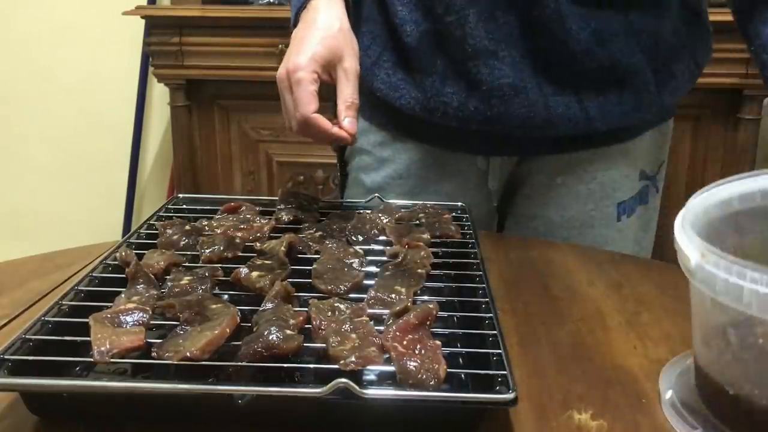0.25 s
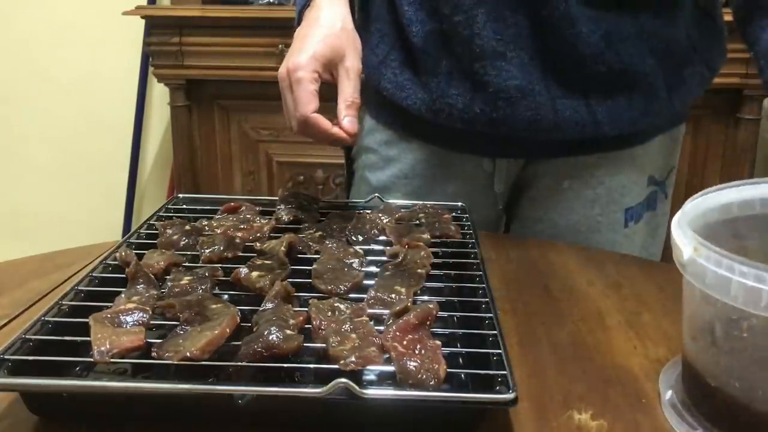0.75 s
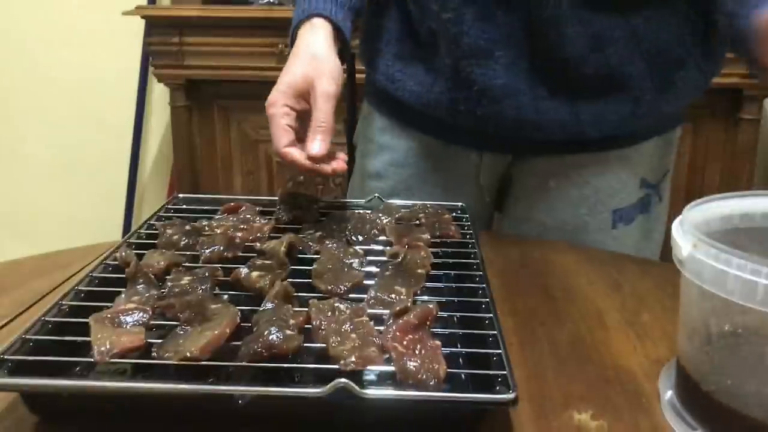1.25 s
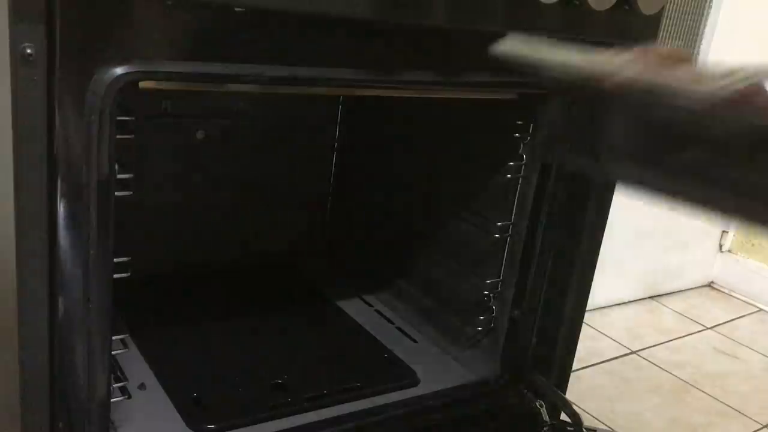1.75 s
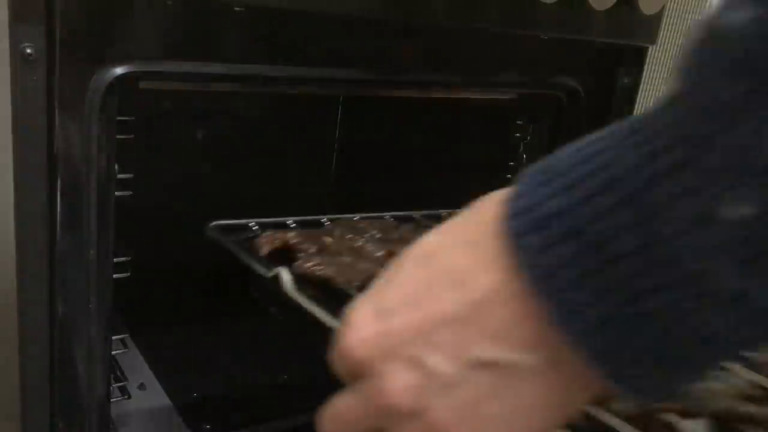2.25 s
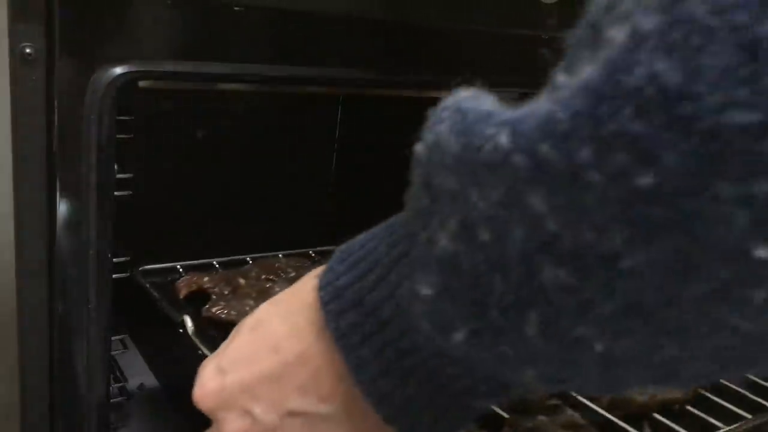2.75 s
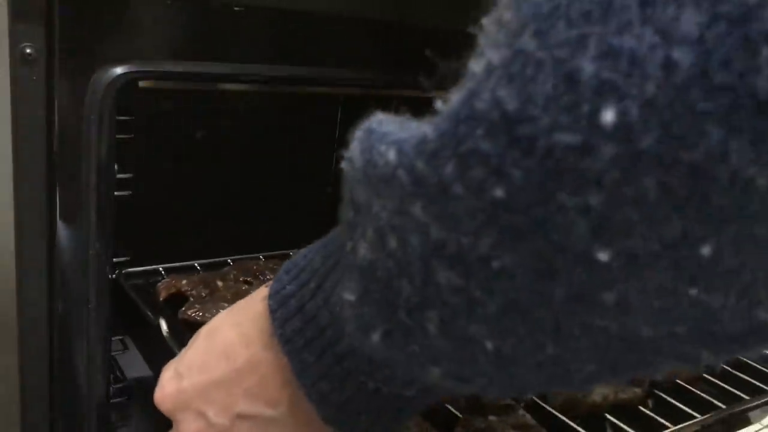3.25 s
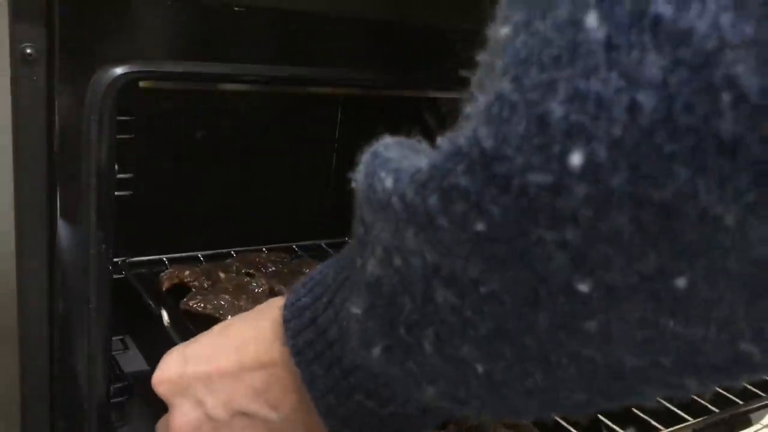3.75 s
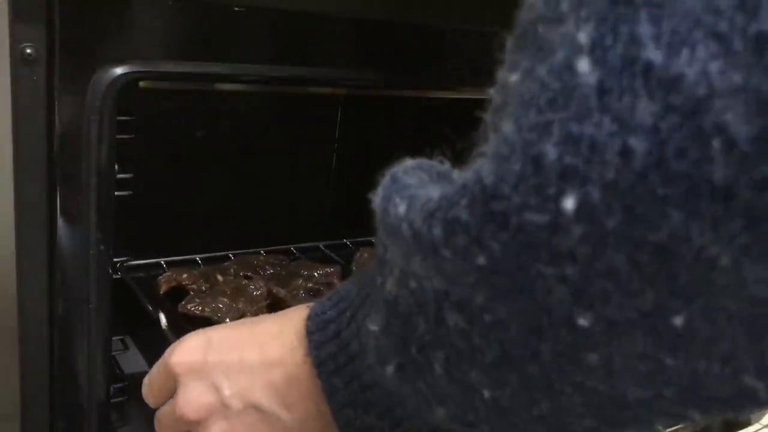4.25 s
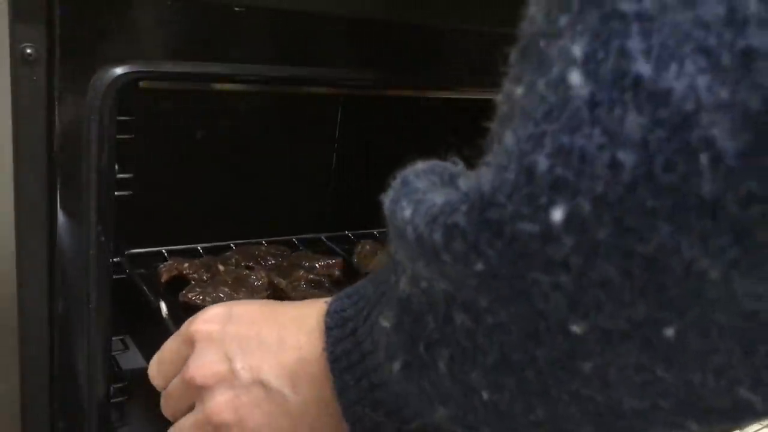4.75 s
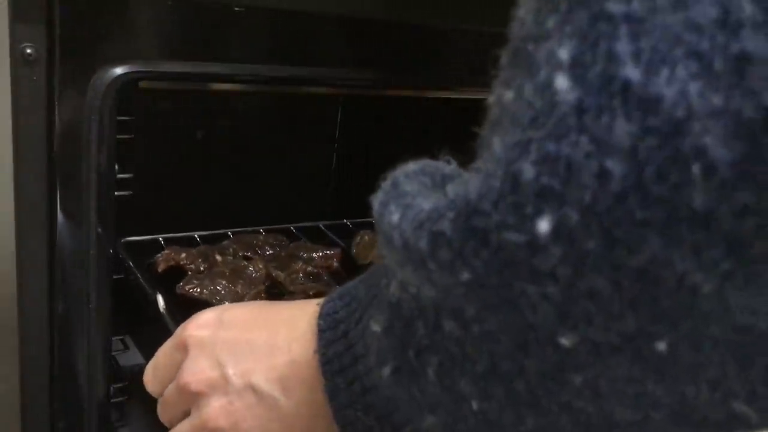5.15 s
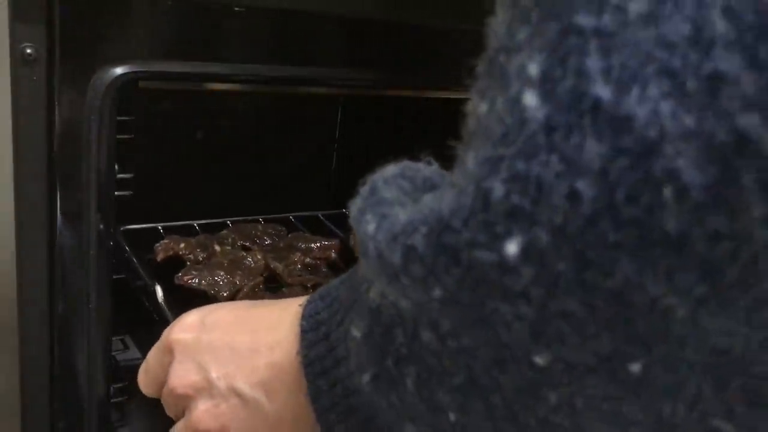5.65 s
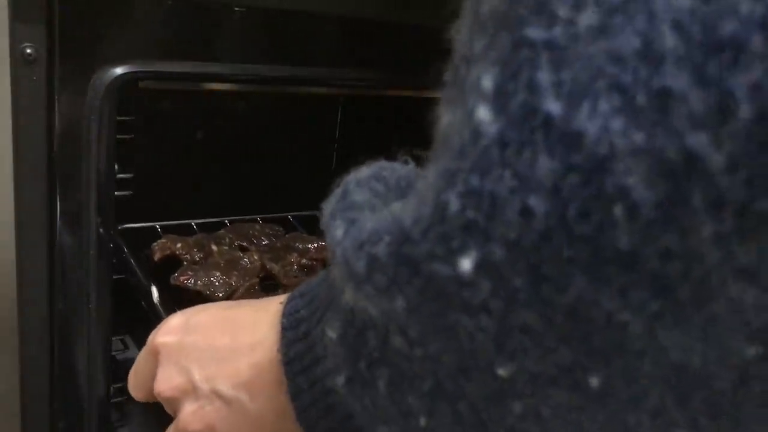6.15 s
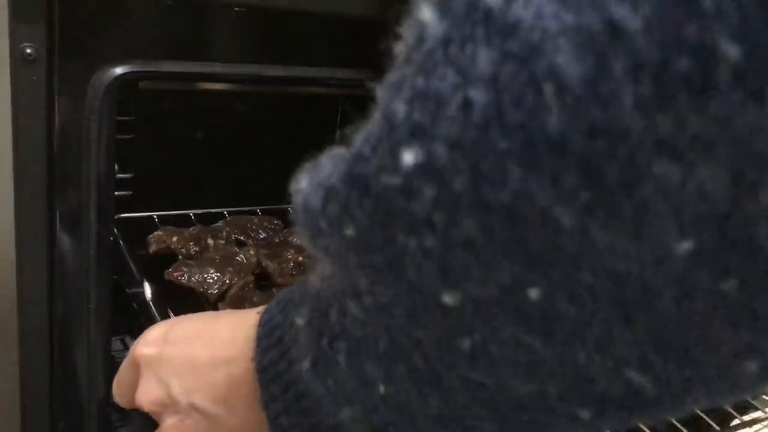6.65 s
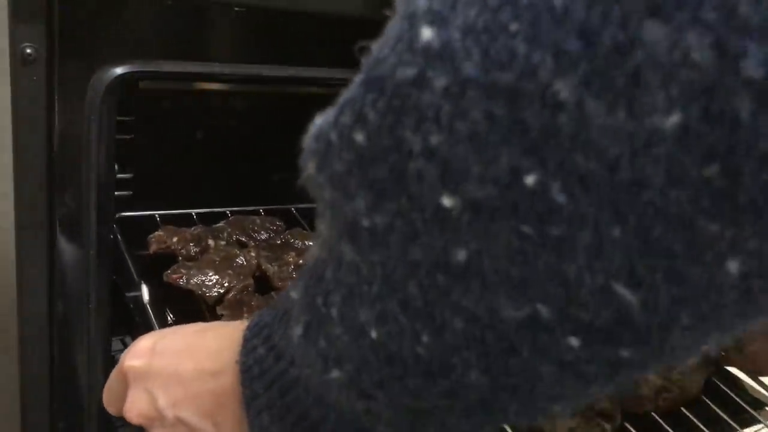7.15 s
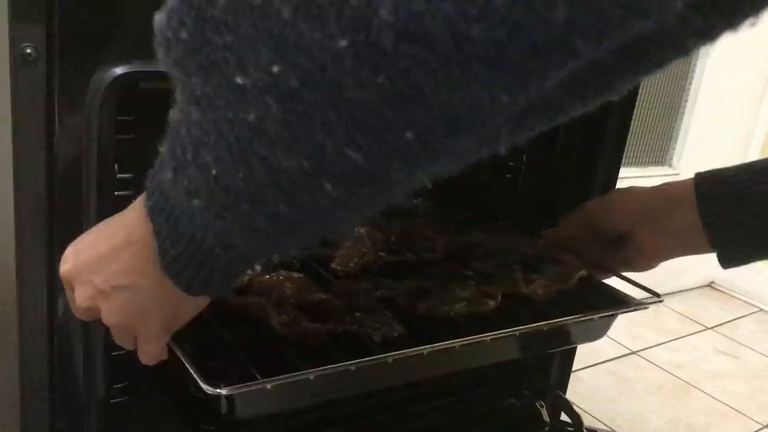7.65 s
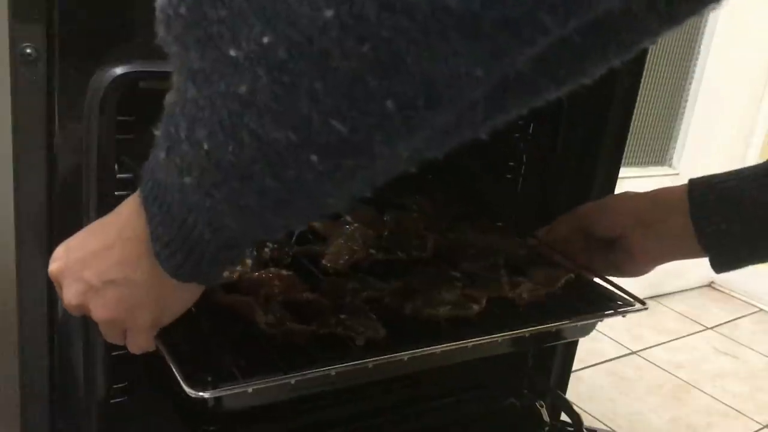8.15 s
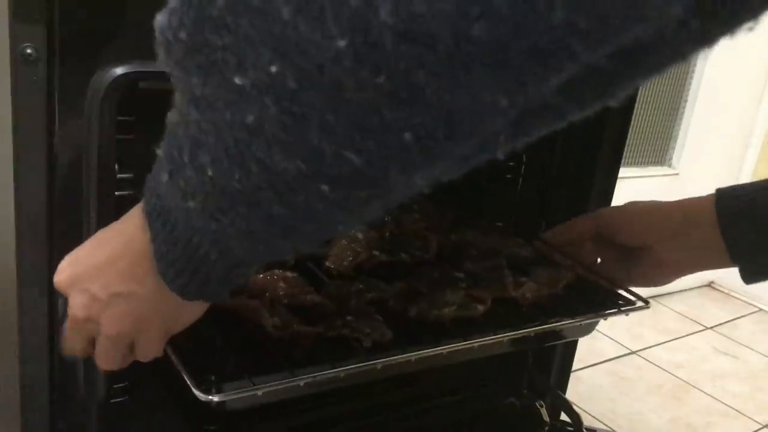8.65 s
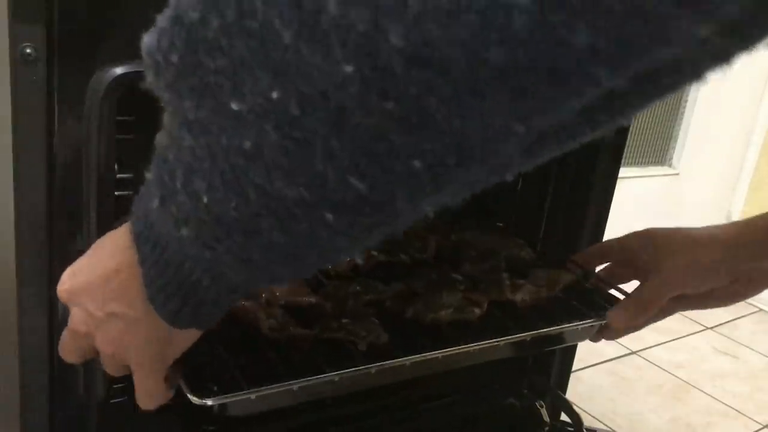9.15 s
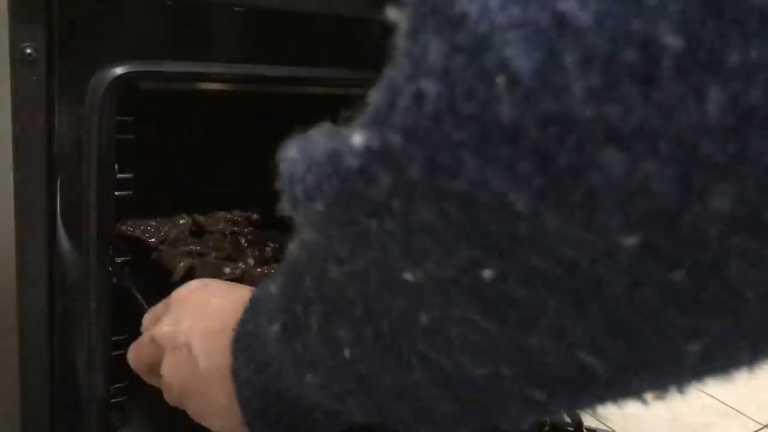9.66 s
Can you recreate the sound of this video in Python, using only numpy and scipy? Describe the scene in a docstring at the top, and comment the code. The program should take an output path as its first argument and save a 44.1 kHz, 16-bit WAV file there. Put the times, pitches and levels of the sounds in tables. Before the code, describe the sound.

Faint microphone hiss lies under a small, hard, tiled kitchen. At about 0.4 s a plastic tub gives a quick cluster of clicks on a wooden table, then faint taps and a tiny drag, and at 0.9 s it is set down with a loud, sharp thud. From 1.4 to 2.3 s slippers scuff and step over tiles, the second heel tap firmer. After a pause, a wire rack on a baking tray clanks at 3.4 s, then knocks and chatters sparsely until 6.4 s, when a stronger clank rings. Around 7.5 to 7.7 s it scrapes grittily along the oven runners; more clanks follow at 8.0 s, with a hard bright bang near 8.5 s and low, faint tray flexing. After smaller rattles, loud jangling blows burst from 9.4 to 9.8 s. The steel oven adds a short, boxy ring.

```python
"""A small hard kitchen with a tiled floor and an open oven, under a faint microphone hiss.
A plastic tub clicks, drags and thuds onto a wooden table; slippers scuff and step over the tiles.
Then a wire rack on a baking tray knocks, chatters and scrapes along the oven runners.
Short contact pressures and gritty noise are heard directly and drive the ringing modes of table, tray
and wires. Tub and slippers echo in the room, the rack in the steel oven."""
import sys
import numpy as np
from scipy import signal
from scipy.fft import rfft, irfft
from scipy.io import wavfile

SR = 44100
rng = np.random.default_rng(int(sys.argv[2]) if len(sys.argv) > 2 else 0)


def pcm_store(signal):
    """Save signal as 16-bit PCM."""
    levels = np.round(np.clip(np.atleast_2d(signal), -1, 1) * 32767)
    wavfile.write(sys.argv[1], SR, levels.astype(np.int16).T)


N = 436590

# Levels are relative: each source is balanced again where it is mixed.
# Hiss colour: (frequency [Hz], density [dB per Hz])
HISS_SPECTRUM = [(15, -51.5), (25, -14.5), (48, -11.5), (59, -1), (80, -1), (108, -12), (157, -7.5),
                 (416, -13.5), (489, -19), (2910, -26), (6210, -29), (14800, -33), (16000, -27.5)]
HISS_DB = -63   # before the drift
# The hiss rises and sinks a little: (time [s], gain [dB])
HISS_DRIFT = [(-.1, 0.5), (1.4, 6.5), (3.3, 2), (7.3, 2.5), (10.1, 5.5)]
# Microphone colour: (frequency [Hz], gain [dB])
MIC_SPECTRUM = [(30, -13.5), (100, -1.5), (5000, 0.5), (8000, 2.5), (10500, 4), (13000, 8), (15500, 6)]
CUTOFF_HZ = 16600

# Echo decay in the kitchen: (frequency [Hz], t60 [s])
KITCHEN_DECAY = [(60, 0.54), (250, 0.49), (1000, 0.51), (4000, 0.49), (8000, 0.49), (15000, 0.084)]
# Echo decay inside the oven: (frequency [Hz], t60 [s])
OVEN_DECAY = [(60, 0.33), (250, 0.71), (1000, 0.52), (2500, 0.33), (5000, 0.28), (9000, 0.27),
              (15000, 0.077)]

# Soles scuffing over tiles: (time [s], held [s], level [dB], treble level [dB])
SCUFFS = [(1.40, 0.17, -62.5, -70), (1.706, 0.13, -44, -78), (2.055, 0.041, -44.5, -53.5),
          (2.194, 0.0074, -32.5, -60), (2.255, 0.016, -40.5, -55)]
SCUFF_SWELL_DB_PER_S, SCUFF_FADE_DB_PER_S = 1300, 303
# Slipper heels on tiles: (time [s], level [dB])
HEEL_STEPS = [(1.704, -34.5), (2.1907, -24.5)]
HEEL_RISE_S, HEEL_CONTACT_S = 0.00042, 0.0051
# Heel bands against the step level
HEEL_THUD_DB, HEEL_MIDDLE_DB, HEEL_BRIGHT_DB, HEEL_TREBLE_DB = -28, 6, -8.5, -25

# Tub on table: (time [s], peak [dB], thud [dB], brightness [dB], contact [s], favoured table mode [Hz])
TUB_TAPS = [(0.3714, -30, -39, -5, 0.0037, 136), (.3743, -19, -48.5, 1, 0.0023, 136),
            (0.3861, -23, -41.5, 6, 0.0023, 136), (0.4067, -27, -45.5, -1, 0.0032, 136),
            (0.4298, -26.5, -42.5, 1.5, .001, 136), (0.4814, -37.5, -51.5, -1.5, .0015, 136),
            (.641, -46, -83, 2, .0012, 136), (0.683, -41, -54.5, -0.5, 0.0087, 136),
            (0.8848, -32, -47.5, 1.5, .0015, 136), (0.9325, 0, -10, 9.5, 0.0032, 194)]
# Middle and treble against the peak, at brightness 0
TAP_RISE_S, TAP_MIDDLE_DB, TAP_TREBLE_DB = 0.00086, 0, -24
# Table top modes: (frequency [Hz], level [dB], t60 [s], capped at 1200 cycles)
TABLE_MODES = [(86.6, 4.5, 0.18), (142.3, -4.5, 0.18), (194.5, -19, 0.3), (251.6, -8, 0.17),
               (312.7, -8.5, 0.11), (429, -2, 0.25), (559, -4.5, .25), (823, -7, .25)]
TABLE_FAVOUR_DB = 19.5
# The tub drags a little before it is set down hard: (time [s], held [s], level [dB])
TUB_DRAGS = [(.68, .015, -69), (.87, .05, -63)]
DRAG_SWELL_DB_PER_S, DRAG_FADE_DB_PER_S = 71, 253.5
# What the tub sends to the walls: (frequency [Hz], gain [dB])
TUB_TO_ROOM = [(100, -6.5), (1000, 0), (3500, -9.5), (10000, -7)]

# The loaded tray flexes as it is pushed: (time [s], held [s], level [dB])
TRAY_FLEXES = [(8.25, .03, -49.5), (8.59, 0.025, -51), (8.85, .04, -48.5)]
FLEX_HZ, FLEX_SWELL_DB_PER_S, FLEX_FADE_DB_PER_S = 58.4, 146, 120

# Rack and tray on the runners: (time [s], peak [dB], boom [dB], brightness [dB], chatter [s],
# favoured tray mode [Hz], favoured wire mode [Hz]); a mode of 0 or below favours none
RACK_CLANKS = [(3.4074, -17.5, -34, 4.5, 0.0086, 0, 2335), (3.6154, -39, -42.5, -12, 0.0056, 121, 2915),
               (3.8753, -28.5, -42.5, 1, 0.0087, 0, 1024), (4.4248, -54, -68, -16, .008, 0, 0),
               (4.5649, -29.5, -37, 8, 0.015, 0, 2127), (4.7006, -55, -48, -18, 0.012, 0, 0),
               (4.7806, -31, -36.5, -2, 0.0082, 121, 0), (4.954, -52, -44, 24, 0.0068, 0, 0),
               (5.1209, -24.5, -32.5, 5, 0.023, 0, 1615), (5.1506, -34.5, -24, 4, 0.014, 0, 0),
               (5.3168, -29, -40, -3.5, 0.0089, 0, 1700), (5.488, -53, -65, -10, 0.037, 0, 0),
               (5.5417, -35.5, -35.5, 0.5, 0.012, 202, 2335), (5.569, -44.5, -46, 12, 0.043, 202, 0),
               (5.9287, -63, -52.5, -14, 0.0088, 0, 1615), (6.0072, -55.5, -53.5, -6, .011, 291, 1328),
               (6.4478, -20, -34.5, 5, 0.01, 0, 1850), (6.5227, -44, -31, -9, 0.017, 0, 0),
               (6.5518, -34.5, -54, -5, 0.0059, 0, 2750), (6.7934, -46, -48, 3, 0.03, 0, -3),
               (7.0772, -46, -40, -5, 0.016, 121, 0), (7.1413, -24.5, -39.5, 5.5, 0.011, 264, 0),
               (7.386, -47.5, -69, 8, 0.016, 0, 0), (7.6416, -40, -48, 15, 0.0063, 0, 0),
               (7.7088, -37.5, -47, 21, 0.0039, 0, 0), (7.7636, -33, -46, -1, 0.0077, 0, 0),
               (7.9926, -31.5, -67, -3, 0.0038, 0, 0), (8.0375, -17.5, -33.5, 2.5, 0.011, 0, 2335),
               (8.0874, -37, -54, 0, 0.012, 0, 0), (8.163, -24, -40.5, 7, 0.014, 0, 0),
               (8.192, -45, -45, -6, .008, 0, 0), (8.3732, -50.5, -55, -20, .012, 0, 0),
               (8.4581, -7, -53, 4, 0.0089, 403, 0), (8.4657, -9.5, -48, 14.5, 0.0048, 403, 0),
               (8.5035, -23.5, -30, -17.5, 0.013, 403, 1106), (8.6488, -34, -35.5, -3, 0.0082, 0, 0),
               (8.701, -25, -38, 13.5, 0.012, 0, 0), (8.7362, -28, -37.5, -7.5, 0.0135, 0, -2),
               (8.9457, -34.5, -50, -4.5, 0.0076, 0, 0), (9.279, -49.5, -71, -13, .009, 0, 1178),
               (9.4095, -8, -60, 8, 0.012, 0, 1024), (9.424, -17.5, -41.5, -5, 0.015, 0, 1178),
               (9.4814, -11.5, -37, 6.5, 0.0082, 440, 2012), (9.5395, -22, -46, 5, 0.004, 0, 0),
               (9.5802, -21.5, -36, 3.5, 0.022, 0, 0), (9.7573, -23, -29.5, -3, 0.035, 86, -10),
               (9.7741, -17, -64, 8, 0.013, 0, -11), (9.859, -38, -48, 10, 0.0079, -4, 0)]
# Middle and treble against the peak, at brightness 0 and the usual level
CLANK_RISE_S, CLANK_MIDDLE_DB, CLANK_TREBLE_DB = 0.0024, -6, -9.5
# Middle and treble gain this share of a blow's dB above the usual
WIDENING, USUAL_DB = 0.11, -24
# How hard the rack drags on the runners: (time [s], level [dB])
RACK_SLIDES = [(3.45, -50), (3.8, -62.5), (3.95, -51.5), (4.15, -59.5), (4.33, -54.5), (4.6, -56),
               (5.7, -66.5), (6.3, -69.5), (6.6, -49), (6.8, -55), (7.1, -56), (7.3, -72), (7.45, -44),
               (7.584, -31), (7.648, -43), (7.722, -36), (8.07, -45), (8.2, -63), (8.45, -47), (8.8, -48.5),
               (9.4, -51.5)]
SLIDE_BOOM_DB, SLIDE_TREBLE_DB = -6, -6.5   # against the drag
SLIPS_PER_S, SLIP_DB = 50, 4   # the sliding rack sticks and slips
# Baking tray modes: (frequency [Hz], level [dB], t60 [s], capped at 1200 cycles)
TRAY_MODES = [(67.5, -2.5, 0.13), (86.8, -8, 0.32), (119.7, -4, 0.184), (155.7, -7.5, 0.24),
              (201.8, -3.5, 0.99), (231.9, 1.5, 0.89), (263.6, -4.5, 0.3), (292.3, -6.5, 0.4),
              (336, -3, 0.054), (403, -25, 0.91), (430.4, -0.5, 0.24), (656, 1.5, 0.09)]
# Wire rack modes: (frequency [Hz], level [dB], t60 [s], capped at 1200 cycles)
WIRE_MODES = [(841.5, -7, 0.34), (1030, -11, 0.31), (1105, -10, 0.087), (1169, -12, 0.041),
              (1328, -22, 0.11), (1497, -8, .3), (1617, -10.5, 0.14), (1704, -9.5, 0.44), (1850, -14, 0.22),
              (2012, -14, 0.62), (2100, -14.5, 0.37), (2335, -11.5, 0.45), (2734, -12.5, 0.2),
              (2900, -13.5, 0.25), (3200, -9.5, 0.12), (3440, -11, 0.68), (3660, -14, 0.59),
              (3764, -6, 0.069), (4230, -9.5, 0.17), (4786, -15, 0.24), (5580, -10, .2), (5740, -28, 0.6),
              (6900, -26, 0.091), (7000, -17, 0.055), (7580, -31, 0.19), (8400, -12, 0.075),
              (9400, -15, 0.14), (11800, -7, 0.087), (13100, -3, 0.06), (15150, -21, .08)]
TRAY_FAVOUR_DB, WIRE_FAVOUR_DB = 13.5, 16
# Colour of the direct steel chatter: (frequency [Hz], gain [dB])
STEEL_SPECTRUM = [(300, 8), (700, -1.5), (1200, 2), (2500, -1), (4000, -1.5), (7000, -8.5), (10000, -9.5),
                  (13000, -6), (15500, -9)]


def from_db(db):
    """Gain of a level in dB."""
    return 10 ** (np.asarray(db) / 20)


def rms_one(x):
    """Scaled to rms 1."""
    return x / np.sqrt(np.mean(x ** 2) + 1e-20)


def in_time(rows):
    """Level columns as gains per sample, silent outside the rows."""
    times, *columns = np.transpose(rows)
    t = np.arange(N) / SR
    return [from_db(np.interp(t, times, column, left=-200, right=-200)) for column in columns]


def at_hz(points, hz):
    """A spectrum read on a log-frequency axis."""
    points_hz, values = np.transpose(points)
    return np.interp(np.log(hz + 1), np.log(points_hz), values)


def shaped(x, spectrum):
    """Coloured by a spectrum."""
    gains = from_db(at_hz(spectrum, np.fft.rfftfreq(N, 1 / SR)))
    return irfft(rfft(x) * gains, N)


def band(x, low_hz, high_hz):
    """Band-pass with make-up gain, so that white noise roughly keeps its rms."""
    sos = signal.butter(2, [low_hz, min(high_hz, .45 * SR)], "band", fs=SR, output="sos")
    return signal.sosfilt(sos, x + 1e-18) * np.sqrt(SR / 2 / (high_hz - low_hz))


def upper_bands(middle, bright, treble):
    """Three neighbouring bands, signs alternating so that they join without gaps."""
    return band(bright, 1900, 6000) - band(middle, 450, 1900) - band(treble, 6000, 18000)


def tilted(db, low_db, brightness_db, middle_db, treble_db):
    """Levels (bright, low, middle, treble): a brighter blow gains treble and loses as much middle."""
    return [db, low_db, db + middle_db - brightness_db, db + treble_db + brightness_db]


def contact(starts, levels_db, rise, lengths):
    """Pressure of each blow: a sudden touch that swells, then dies away; one row for each band's level."""
    out = np.zeros((4, N))
    for start, gains, length in zip(starts, from_db(levels_db).T, lengths):
        at = round(start * SR)
        t = np.arange(min(N - at, int(length * 10 * SR) + 40)) / SR
        shape = (1 - .8 * np.exp(-t / rise)) * np.exp(-t / length)
        out[:, at:at + len(t)] += gains[:, None] * shape / shape.max()
    return out


def first_touch(pressure):
    """The click where a pressure jumps up."""
    return np.maximum(np.diff(pressure, prepend=0), 0)


def strokes(rows, swell_db_per_s, fade_db_per_s):
    """Each stroke swells, holds and fades; one gain per sample for each level column."""
    t, out = np.arange(N) / SR, 0
    for start, held, *levels_db in rows:
        before, after = np.maximum(start - t, 0), np.maximum(t - start - held, 0)
        loss_db = swell_db_per_s * before + fade_db_per_s * after
        out = out + from_db(np.array(levels_db)[:, None] - np.minimum(loss_db, 200))
    return out


def grit(per_s, spread_db):
    """Tiny random contacts of uneven size; rms 1."""
    sizes_db = spread_db * np.minimum(rng.exponential(1, N), 5)
    sizes = from_db(sizes_db) * rng.choice([-1, 1], N)
    return rms_one(sizes * (rng.random(N) < per_s / SR))


def ring(force, modes, landings, spread_db):
    """A force rings all the modes; each blow lands elsewhere, so it may favour one and varies them all."""
    starts, most_hz, favour_db = landings
    # each landing place takes over 10 ms ahead of its blow
    blow = np.maximum(np.searchsorted(starts - .01, np.arange(N) / SR) - 1, 0)
    favoured = np.abs(np.array(modes)[:, 0] - most_hz[:, None]).argmin(axis=1)
    favoured[most_hz < 30] = -1   # none
    way = rng.choice([-1, 1], (len(starts), len(modes)))   # pushed or pulled
    chance = rng.standard_normal((len(starts), len(modes)))
    out = 0
    for k, (hz, db, t60) in enumerate(modes):
        r = from_db(-60 / (np.clip(t60, .005, 1200 / hz) * SR))   # pole radius gives the decay
        blow_db = db + favour_db * (favoured == k) + spread_db * chance[:, k]
        struck = force * from_db(blow_db)[blow] * way[blow, k]
        for ratio, share in (1, 1), (1.011, .7):   # a close twin beats against the mode
            w = 2 * np.pi * hz * ratio / SR
            strike = [0, share * np.sin(w) * np.sqrt(1 - r)]
            out = out + signal.lfilter(strike, [1, -2 * r * np.cos(w), r * r], struck)
    return out


def hiss():
    """Microphone hiss: coloured steady noise that drifts a little in level."""
    noise = rms_one(shaped(rng.standard_normal(N), HISS_SPECTRUM))
    return from_db(HISS_DB) * in_time(HISS_DRIFT)[0] * noise


def echoes(x, t60s):
    """Dense echoes from hard walls: noise that dies at its own pace in each half octave."""
    t = np.arange(SR // 2) / SR
    edges = 40 * 2 ** np.arange(0, 9, .5)
    tail = 0
    for low, high in zip(edges, edges[1:]):
        decay = from_db(-60 * t / at_hz(t60s, np.sqrt(low * high)))
        tail = tail + band(rng.standard_normal(len(t)), low, high) * np.sqrt(high - low) * decay
    tail = tail * (1 - np.exp(-t / .006))   # the first echoes take a moment
    return signal.fftconvolve(x, tail / np.sqrt(np.sum(tail ** 2)))[:N]


def slippers():
    """Soles swish as swelling noise; heels tap as short bursts with a low thud."""
    noise = rng.standard_normal(N)
    middle, treble = strokes(SCUFFS, SCUFF_SWELL_DB_PER_S, SCUFF_FADE_DB_PER_S)
    swish = band(middle * noise, 550, 5200) - band(treble * noise, 4500, 24000)
    starts, db = np.transpose(HEEL_STEPS)
    levels_db = db + np.array([[HEEL_BRIGHT_DB], [HEEL_THUD_DB], [HEEL_MIDDLE_DB], [HEEL_TREBLE_DB]])
    pressure = contact(starts, levels_db, HEEL_RISE_S, np.full(len(starts), HEEL_CONTACT_S))
    bright, low, tap, sharp = pressure * noise
    heel = from_db(18) * band(low, 110, 260) + upper_bands(tap, bright, sharp)
    return from_db(-7) * swish + from_db(-5) * heel


def plastic(drive):
    """Stiff plastic's voice: the bright part, filtered twice over, joined by middle and treble."""
    bright, _, middle, treble = drive
    return upper_bands(middle, band(bright, 300, 8000), treble)


def tub():
    """Stiff plastic clicks at first touch and grates briefly; its smooth push thuds in the table top.
    Gives the sound close by and what reaches the walls, where the faint grating is lost."""
    starts, db, thud_db, brightness_db, length, table_hz = np.transpose(TUB_TAPS)
    levels_db = tilted(db, thud_db, brightness_db, TAP_MIDDLE_DB, TAP_TREBLE_DB)
    pressure = contact(starts, levels_db, TAP_RISE_S, length)
    click = plastic(from_db(14.5) * first_touch(pressure))
    grating = plastic(from_db(-18.5) * pressure * rng.standard_normal(N))
    thud = band(pressure[1], 130, 1000)
    table = ring(thud, TABLE_MODES, (starts, table_hz, TABLE_FAVOUR_DB), spread_db=4)
    drag_gain, = strokes(TUB_DRAGS, DRAG_SWELL_DB_PER_S, DRAG_FADE_DB_PER_S)
    drag = band(drag_gain * rng.standard_normal(N), 900, 5000)
    body = drag + click + from_db(-8.5) * thud + from_db(-23) * table
    return body + grating, shaped(body, TUB_TO_ROOM)


def tray_flex():
    """The sheet swings slowly up and down: a low sine that swells and fades."""
    swing, = strokes(TRAY_FLEXES, FLEX_SWELL_DB_PER_S, FLEX_FADE_DB_PER_S)
    return swing * np.sqrt(2) * np.sin(2 * np.pi * FLEX_HZ * np.arange(N) / SR)


def rack_slide():
    """Steady drag on the runners, unsteadied by stick and slip; one row for each band."""
    knots = np.arange(0, N + SR, SR / SLIPS_PER_S)
    slip_sizes = rng.standard_normal(3000)[:len(knots)]
    slips = from_db(SLIP_DB * np.interp(np.arange(N), knots, slip_sizes))
    band_db = [[-1], [SLIDE_BOOM_DB], [-5], [SLIDE_TREBLE_DB]]
    return slips * in_time(RACK_SLIDES)[0] * from_db(band_db)


def rack():
    """Blows make the loose wires chatter; sliding presses on steadily. Tray and wires ring with both."""
    sliding = rack_slide()
    starts, db, boom_db, brightness_db, length, tray_hz, wire_hz = np.transpose(RACK_CLANKS)
    wide_db = WIDENING * (db - USUAL_DB)
    levels_db = tilted(db, boom_db, brightness_db, CLANK_MIDDLE_DB + wide_db, CLANK_TREBLE_DB + wide_db)
    blows = from_db(-11.5) * contact(starts, levels_db, CLANK_RISE_S, length)
    chatter = (blows + from_db(-13) * sliding) * grit(9000, spread_db=3.5)
    bright, low, middle, treble = chatter
    direct = from_db(-5) * band(low, 103, 383) + shaped(upper_bands(middle, bright, treble), STEEL_SPECTRUM)
    # the first touch of a blow does most of the ringing
    bright, low, middle, treble = from_db(-5) * chatter + from_db(30) * first_touch(blows)
    tray_force, wire_force = band(low, 90, 450), upper_bands(middle, bright, treble)
    tray = ring(tray_force, TRAY_MODES, (starts, tray_hz, TRAY_FAVOUR_DB), spread_db=1.5)
    wires = ring(wire_force, WIRE_MODES, (starts, wire_hz, WIRE_FAVOUR_DB), spread_db=2.5)
    return direct + from_db(-15) * tray + from_db(-9) * wires


def scene():
    """Tub and slippers echo in the room, the rack in the steel oven; flexing and hiss join uncoloured."""
    near_tub, far_tub = tub()
    feet, metal = slippers(), rack()
    room = echoes(far_tub + from_db(-4.5) * feet, KITCHEN_DECAY)
    cavity = from_db(-2) * echoes(metal, OVEN_DECAY)
    noise_floor = hiss()
    picked_up = shaped(near_tub + feet + metal + room + cavity, MIC_SPECTRUM)
    return (picked_up + tray_flex() + noise_floor)[None]


def record(dry):
    """Peaks are clipped just below full scale, then a steep low-pass cuts the top."""
    low_pass = signal.cheby2(20, 80, CUTOFF_HZ, fs=SR, output="sos")
    return signal.sosfilt(low_pass, np.clip(dry, -.97, .97))


dry = scene()
out = record(dry)
pcm_store(out)
```